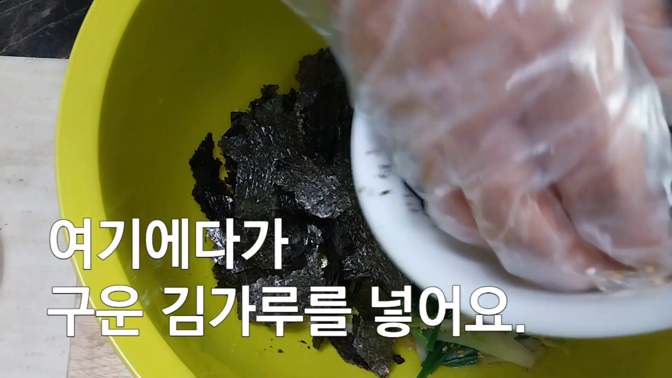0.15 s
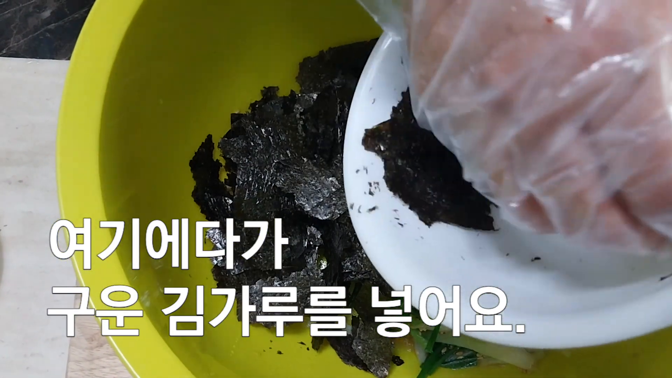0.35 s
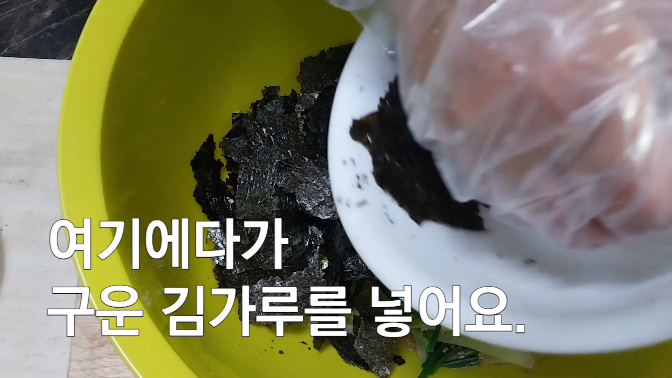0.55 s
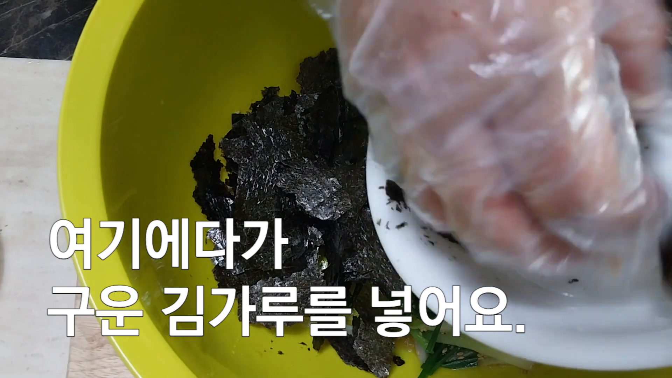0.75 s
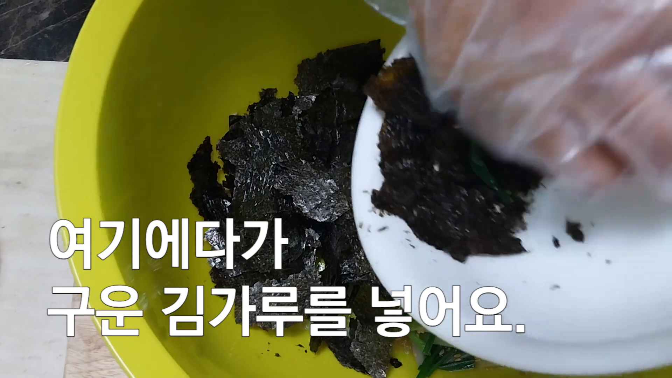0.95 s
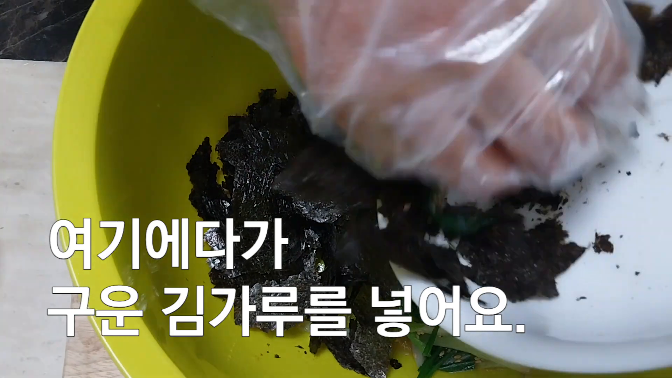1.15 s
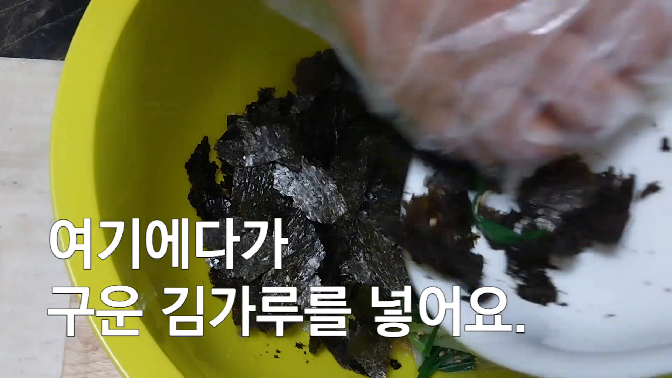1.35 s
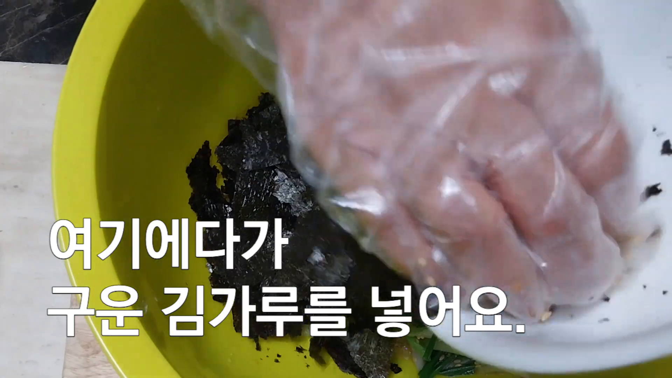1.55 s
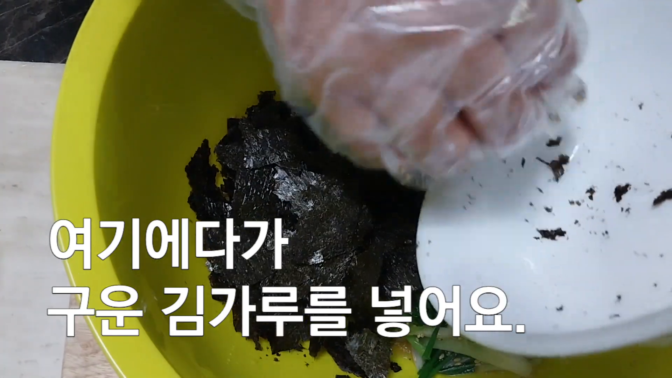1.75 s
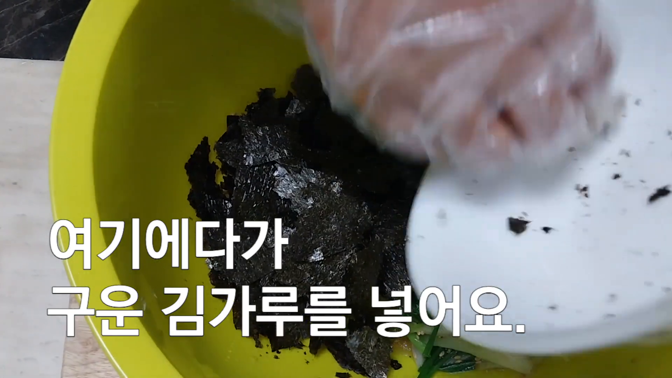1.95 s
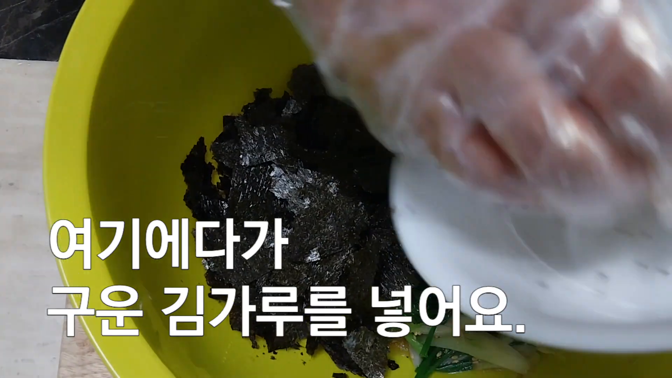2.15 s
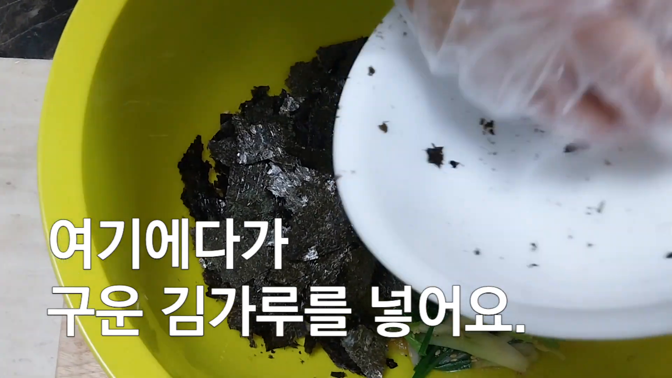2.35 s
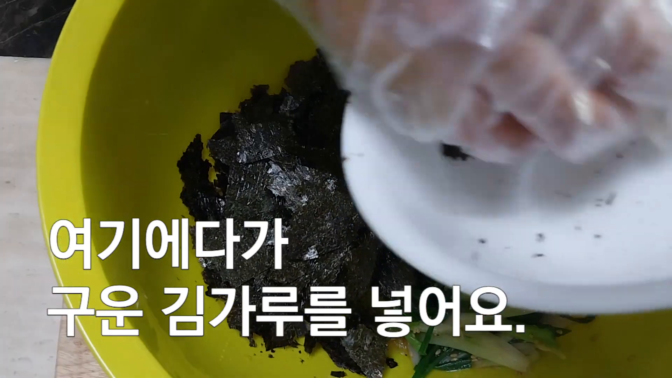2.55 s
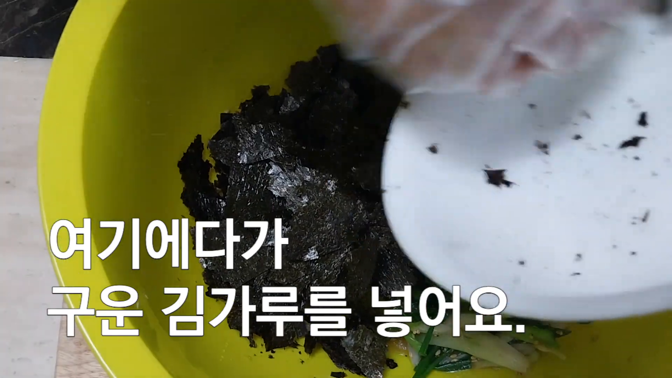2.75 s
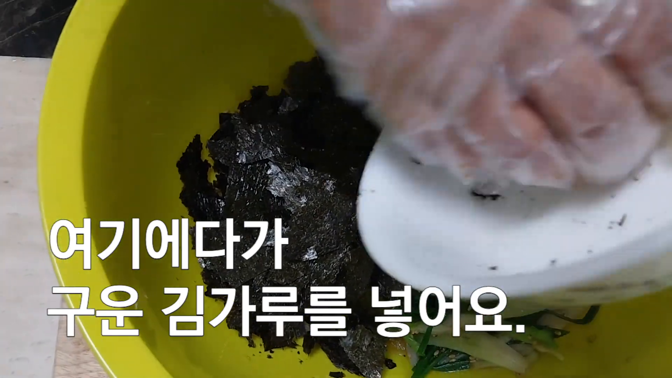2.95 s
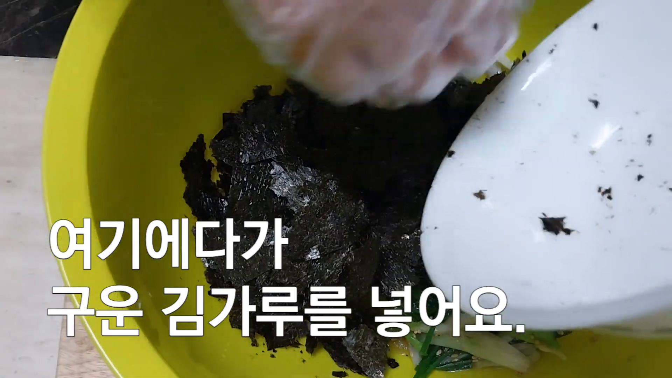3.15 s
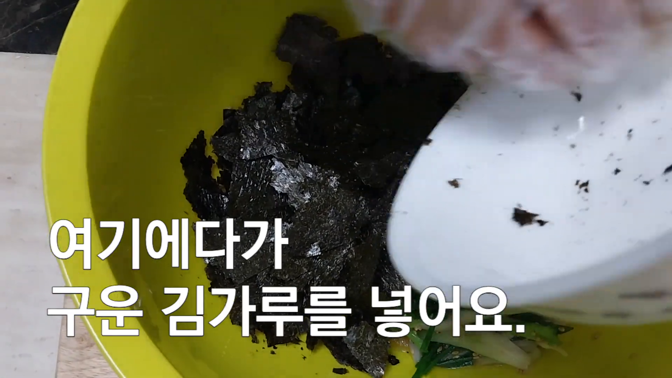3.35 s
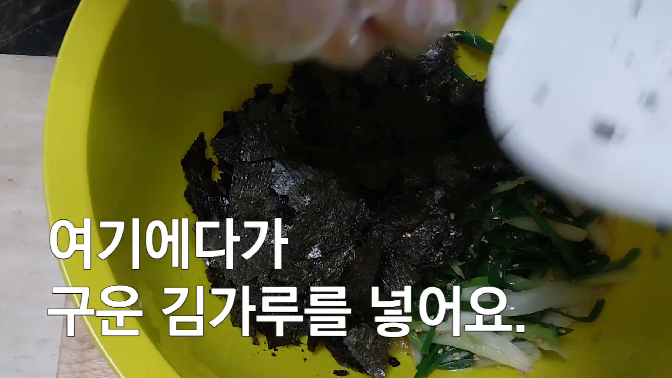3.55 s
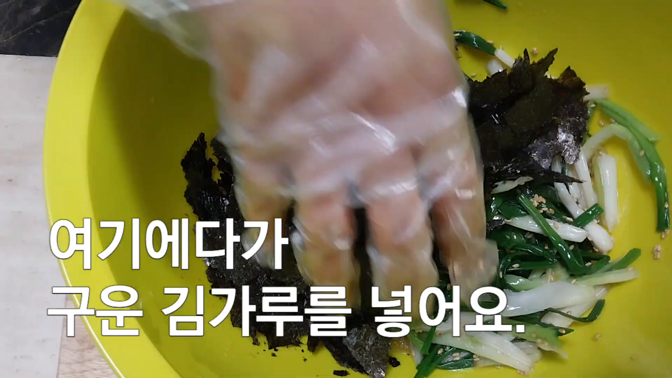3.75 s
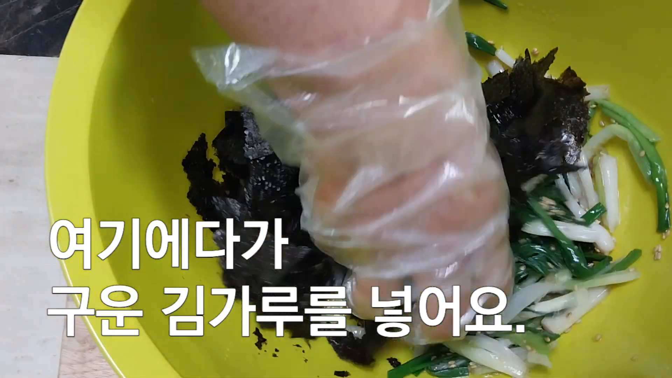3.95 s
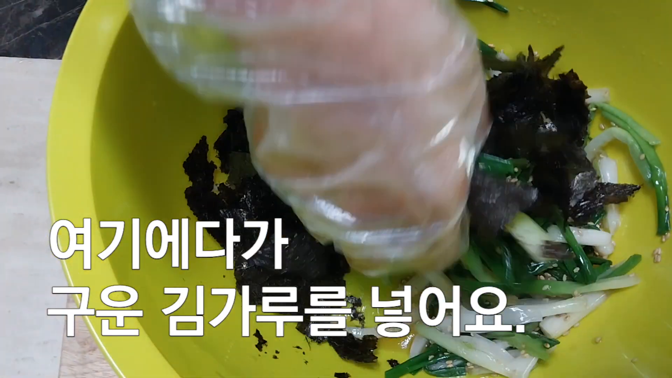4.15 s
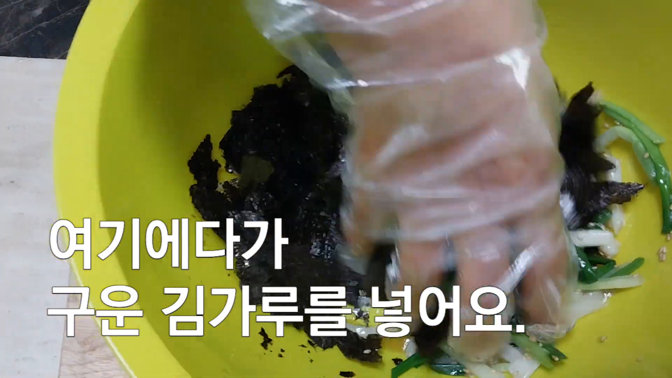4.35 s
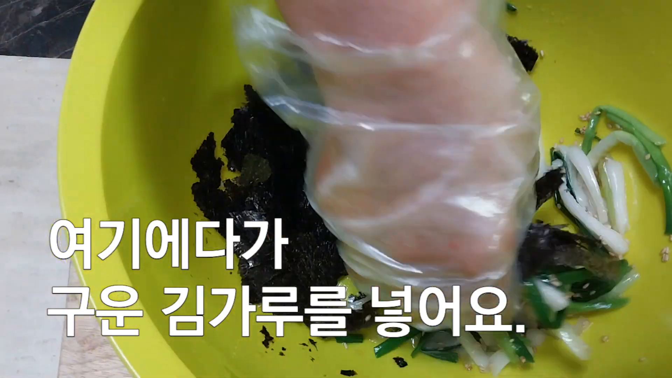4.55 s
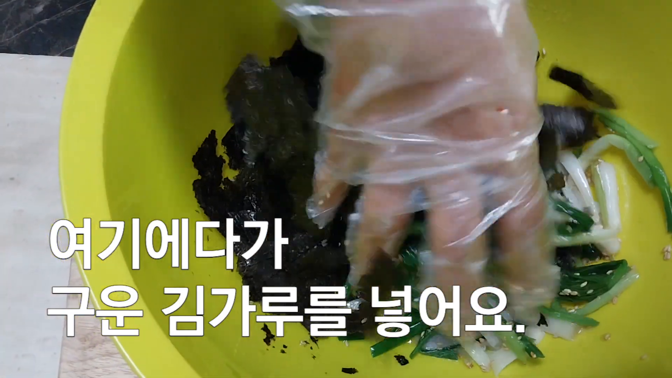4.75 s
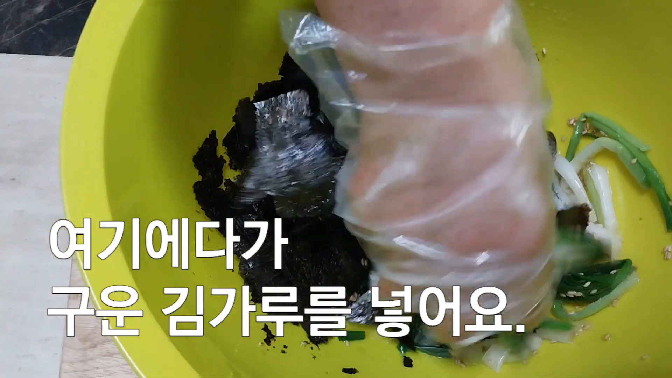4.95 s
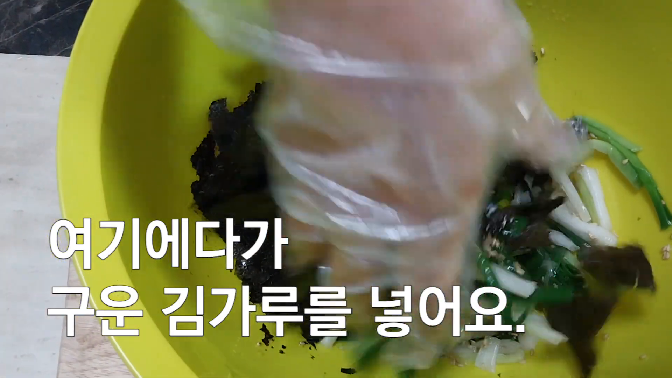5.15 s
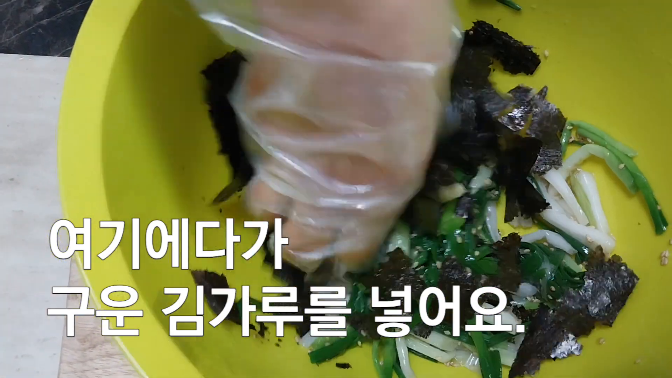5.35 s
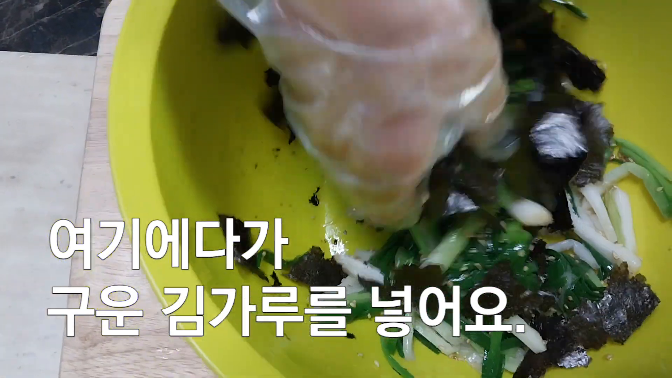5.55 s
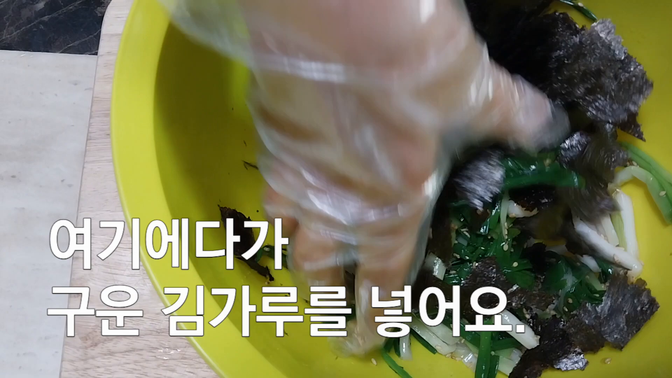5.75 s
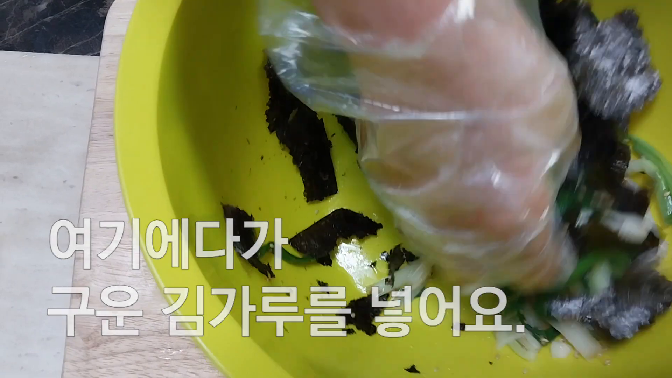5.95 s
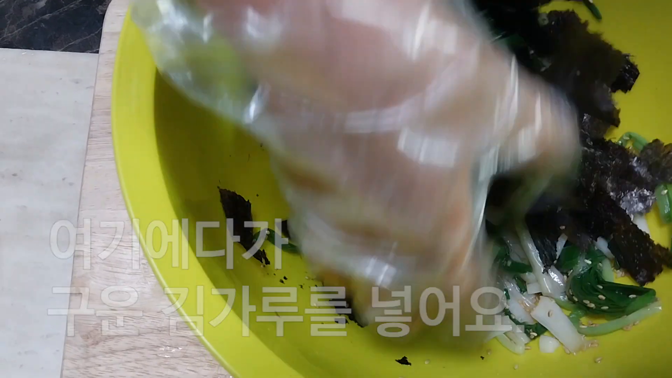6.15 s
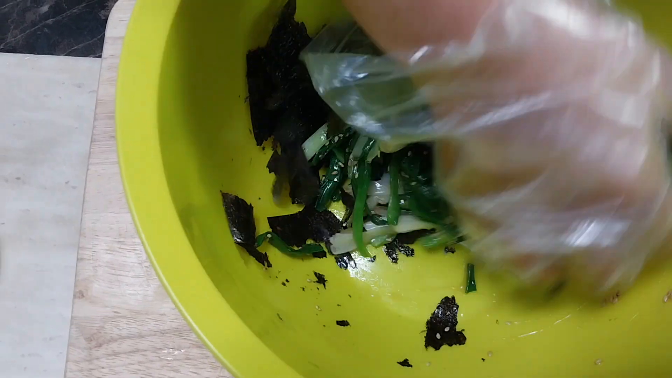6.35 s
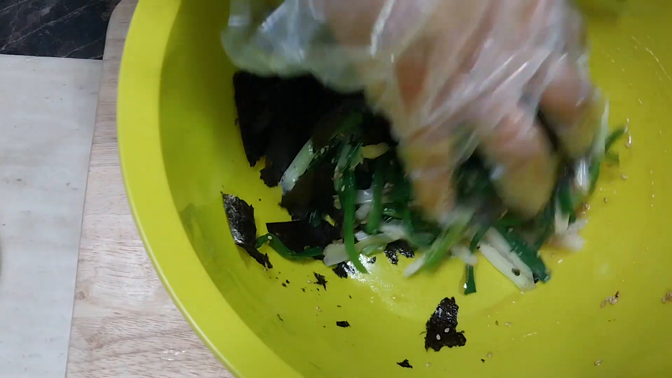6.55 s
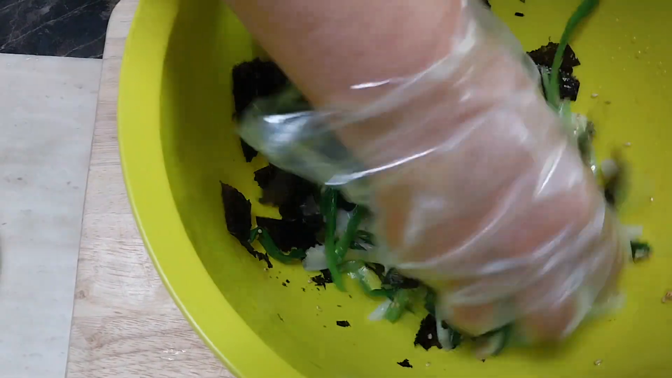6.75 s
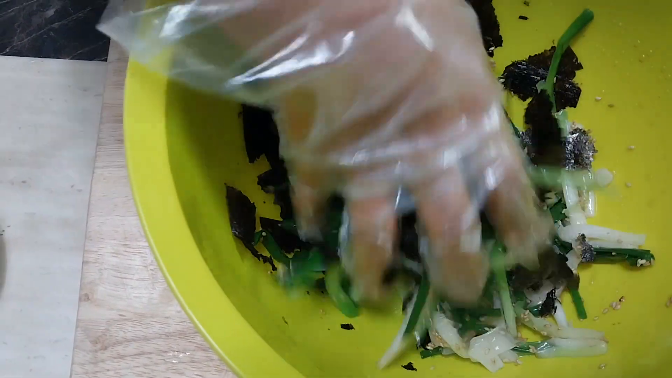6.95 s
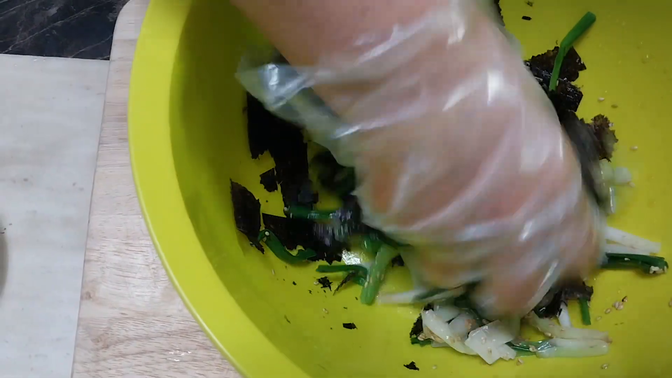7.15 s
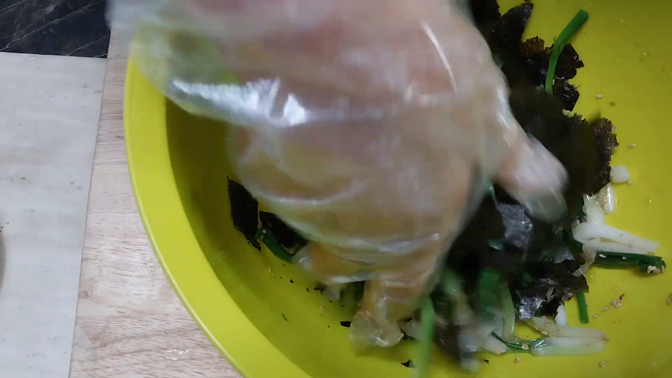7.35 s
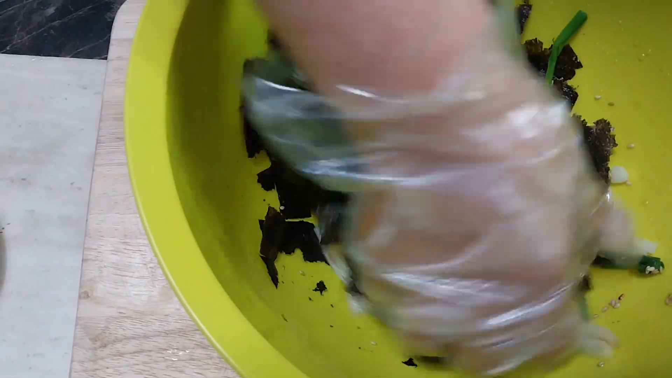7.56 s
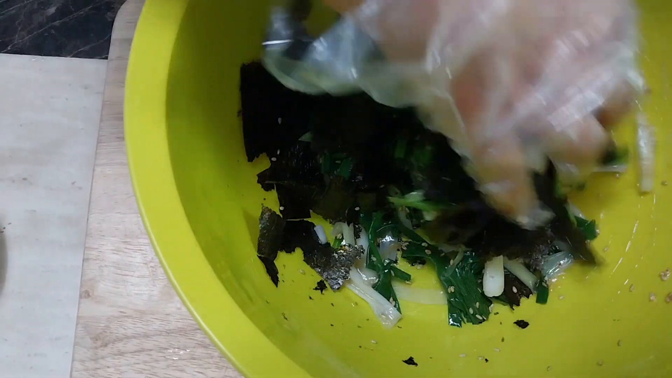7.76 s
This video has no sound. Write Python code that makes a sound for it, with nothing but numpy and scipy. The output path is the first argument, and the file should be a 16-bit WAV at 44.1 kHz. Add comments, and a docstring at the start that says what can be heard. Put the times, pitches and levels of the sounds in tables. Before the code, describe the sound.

A close stereo pickup in a small kitchen with faint air noise and a low, wavering appliance hum. From 0 to 3.5 seconds a hand in a thin plastic glove wipes dry seaweed flakes off a china plate: short, light, irregular strokes of fine crackle, gliding hollow scrapes and sharp little snaps, strongest near 1 second, with very faint china tings. At about 2.8 and 3.55 seconds the plate knocks the plastic bowl, hard and hollow, each followed by a small low thump. From 3.8 seconds the hand tosses the heap in fuller, louder crunchy sweeps, several per second. At 4.5 seconds the plate clatters onto the counter with a woody thud, rattle and brief china ring. Dense rustling continues to nearly 8 seconds, with bright plastic snaps clustering around 5.4, 6.6 and 7.4, over dull wet rubbing and soft plops of greens.

```python
"""A hand in a thin plastic glove wipes dry seaweed off a china plate into a plastic bowl and tosses it with scallions.
Glove and flakes crackle throughout: tiny noise clicks follow the hand's strokes, with louder snaps on top.
Wet greens rub and plop softly, made of dull noise and short low notes.
The plate knocks the bowl twice and clatters onto the counter; dying sine tones make bowl, china and counter ring.
Behind it lie filtered noise for the air, a wavering appliance hum, and the short echoes of a small kitchen."""
import sys
import numpy as np
from scipy import signal
from scipy.fft import rfft, irfft, next_fast_len
from scipy.io import wavfile

SR = 44100
rng = np.random.default_rng(int(sys.argv[2]) if len(sys.argv) > 2 else 0)


def put_to_file(sound):
    """Save the sound as 16-bit audio at rate SR, in the file named by the first command-line argument."""
    columns = np.atleast_2d(sound).T  # one column per channel
    safe = np.clip(columns, -1, 1)
    whole_steps = np.round(safe * 32767)
    wavfile.write(sys.argv[1], SR, whole_steps.astype(np.int16))


N = 343539
T = np.arange(N) / SR
STEPS = T[::64]  # slow clock of the hand's movements [s]
LEFT_RIGHT = np.array([[.5], [-.5]])  # shares a left-minus-right level difference between the sides

# All levels are relative: they set the balance within a source before its later gains.
# wipes of the glove across the plate: (start [s], length [s], crackle level [dB], depth of the crunch [dB])
WIPE_STROKES = [(-.02, 0.056, -42, -9.5), (0.157, 0.21, -48, -6), (0.38, 0.086, -51.5, -3.5),
                (0.45, 0.034, -44.5, -9.5), (0.65, 0.19, -55, -6), (0.836, 0.16, -54.5, -4.5),
                (0.959, 0.11, -40, -5), (1.046, 0.096, -47.5, -4), (1.256, 0.19, -48.5, -5.5),
                (1.56, 0.052, -47, -3.5), (1.633, 0.13, -47.5, -4), (1.804, 0.056, -50.5, -7.5),
                (1.887, 0.025, -47, -3), (1.961, 0.086, -49.5, -5), (2.14, 0.076, -55.5, -26),
                (2.234, 0.032, -50.5, -1), (2.33, 0.22, -60.5, 0), (2.395, 0.024, -45.5, -10),
                (2.463, 0.045, -50, -2.5), (2.587, 0.27, -55.5, -3.5), (2.909, 0.17, -54.5, -1.5),
                (3.109, 0.06, -49.5, -3), (3.25, 0.063, -58, -23), (3.345, 0.043, -53, -4),
                (3.407, 0.063, -51.5, -2), (3.617, 0.17, -53, -8.5)]
WIPE_ATTACK_S, WIPE_RELEASE_S, WIPE_ARCH_DB = 0.02, 0.02, 3  # a wipe is weaker at both ends than halfway
# sweeps of the hand through the heap:
# (crest [s], rise [s], fall [s], crackle level [dB], depth of the crunch [dB])
TOSS_STROKES = [(3.945, 0.098, 0.096, -39, -5.5), (4.055, 0.08, 0.061, -41.5, -5),
                (4.22, 0.069, 0.12, -41, -7.5), (4.45, 0.15, 0.21, -43, -3),
                (4.72, 0.062, 0.035, -42.5, -6.5), (4.934, 0.13, 0.11, -39.5, -4),
                (5.19, 0.11, 0.11, -44, -7.5), (5.3, 0.018, 0.035, -47, -11),
                (5.37, 0.091, 0.14, -40.5, -3), (5.457, 0.086, 0.056, -31.5, -5),
                (5.58, 0.11, 0.087, -40, -7), (5.77, 0.14, 0.14, -43, -7), (5.93, 0.087, 0.068, -43, -2.5),
                (6.17, 0.16, 0.14, -41, -7), (6.41, 0.11, 0.1, -48.5, -4.5), (6.62, 0.12, 0.12, -38, -3),
                (6.76, 0.098, 0.06, -40.5, -7), (6.98, 0.11, 0.12, -41.5, -5.5),
                (7.095, 0.068, 0.093, -34.5, -8), (7.345, 0.098, 0.072, -40.5, -5.5),
                (7.44, .03, 0.037, -46, -7), (7.6, 0.12, 0.11, -43, -7), (7.78, 0.077, .08, -45.5, -7.5)]
EASE_DB, EASE_SHAPE = 9, 1.96  # a sweep is this far down one rise before and one fall after its crest
REST_DB, REST_DEPTH_DB = -61.5, -12  # crackle level and crunch depth between strokes

# dense chance crackle of the flakes: (rate [per s], spread of sizes [dB], level against the stroke [dB])
FLAKE_GRAINS = (6000, 2.5, 3.3)
# sparser chance ticks of the glove: (rate [per s], spread of sizes [dB], level against the stroke [dB])
GLOVE_GRAINS = (170, 3.1, -18)
# tone colour of the crackle: (frequency [Hz], level [dB])
CRACKLE_SPECTRUM = [(40, -22), (250, -20.5), (440, -11.5), (700, -3), (1100, -2), (1400, -4), (2000, -1.5),
                    (3400, -2.5), (5200, 0.2), (6800, -4), (7900, -6), (8700, -13), (9700, -5.5),
                    (12000, 0.5), (15600, -3)]
# resonances of the plate that colour the crackle: (frequency [Hz], width [Hz], level [dB])
PLATE_RESONANCES = [(606, 92, 1), (1100, 74, 10), (1680, 160, -6), (2350, 370, -0.5), (2820, 190, -0.5),
                    (5240, 500, -3)]
# resonances of the bowl that colour the crackle: (frequency [Hz], width [Hz], level [dB])
BOWL_RESONANCES = [(638, 104, 0.5), (1020, 240, -0.5), (1640, 380, 0), (2320, 240, -14),
                   (4900, 2300, -14.5)]
# the hollow of the cupped hand sliding over the plate, and in the last row the plate creaking against the bowl:
# # (start [s], length [s], first pitch [Hz], last pitch [Hz], level [dB])
HOLLOW_SCRAPES = [(.2, 0.19, 1400, 900, -3), (.5, 0.28, 1600, 1750, 7), (.98, 0.15, 1700, 1100, 2),
                  (1.38, 0.082, 1150, 680, 8), (1.64, 0.087, 1100, 720, 0), (1.97, 0.098, 1000, 580, -1),
                  (2.31, .14, 1350, 2100, 9), (2.61, .13, 2000, 1450, 3), (2.783, 0.063, 700, 640, 13)]
SCRAPE_WIDTH_HZ = 450
PLATE_PAN_DB, BOWL_PAN_DB = .4, -2  # left minus right; the hand works to the right once it is in the bowl
TREBLE_PAN_DB, TREBLE_PAN_HZ = -2, 7000  # in the bowl the glove's treble leans further to the right

# single creases and flakes that snap: (time [s], peak level [dB], centre [Hz], length of the crack [ms])
LOUD_SNAPS = [(.0672, -30, 12200, 1), (0.4549, -28, 2060, 1.5), (.4733, -28, 2620, 2),
              (0.821, -33, 12000, 1), (.8405, -33, 12000, 1), (.9328, -32, 5120, 2),
              (0.9517, -19, 12100, .6), (0.9727, -27, 3200, 1.5), (1.0889, -19, 2400, 1.1),
              (1.115, -28, 6000, 1), (1.128, -29, 5500, .6), (1.149, -33, 2400, 1), (1.2181, -33, 4930, 1),
              (1.2665, -33, 2760, 2), (1.4145, -30, 5500, 2), (1.541, -35, 4500, 2),
              (1.4606, -27.5, 4200, 4), (1.4705, -27, 11000, .6), (1.5808, -25, 5180, 1.5),
              (1.9116, -31, 13000, .7), (2.1355, -40, 5150, 1.5), (2.162, -39, 5220, 1),
              (2.2483, -33, 5140, 1), (2.4124, -34, 1920, 2), (2.4892, -25.5, 5110, 1.2),
              (2.494, -26, 5110, 1.2), (2.5945, -32.5, 5830, 2), (2.8145, -31, 5090, 3),
              (2.9931, -28, 5130, 3), (3.0659, -31, 4500, 3), (3.3643, -33, 5120, 3),
              (3.9255, -26, 4080, .4), (4.1515, -27, 10000, .7), (4.357, -21, 13800, .7),
              (4.7795, -26, 11500, 1), (5.2839, -25, 4390, 2.5), (5.4142, -15.5, 3600, .5),
              (5.4695, -16, 4000, .5), (5.4959, -15, 4500, .7), (5.7723, -23, 11600, .5),
              (6.2053, -25, 14400, .5), (6.2542, -24, 3890, 1.6), (6.5126, -23.5, 2600, 2.5),
              (6.5954, -15, 3500, 1.1), (6.6205, -16, 2600, .7), (6.6302, -17, 4000, .7),
              (6.6664, -22, 4690, .3), (6.681, -23, 3000, 3), (6.7093, -21, 13700, .8),
              (6.7385, -24, 13000, .5), (6.7465, -24, 13000, .4), (6.78, -25, 13000, .8),
              (6.787, -26, 1500, .6), (6.9945, -25, 14200, .5), (6.9996, -20, 14100, .5),
              (7.0194, -20, 12400, .5), (7.2775, -28, 5730, 1), (7.3547, -24, 5440, .5),
              (7.4086, -14, 10500, .8), (7.4195, -24, 5910, 1), (7.6525, -25, 14100, .5)]
SPURT_DB, SPURT_S = -17, 0.0091  # noise that trails each crack: level and decay time
# small chance snaps of the glove: their peak in a stroke of USUAL_DB
CRINKLES_PER_S, CRINKLE_DB, CRINKLE_SPREAD_DB, CRINKLE_LOW_HZ = 34, -36.5, 3, 2550
USUAL_DB, CRINKLE_FOLLOW = -44.5, 0.33  # they follow the stroke only in part, so they stand out in the lulls

# the palm bears down on the wet greens: (crest [s], rise [s], fall [s], level [dB])
PALM_PRESSES = [(1.59, 0.013, 0.022, -55), (1.72, .05, 0.063, -55.5), (2.255, 0.01, 0.017, -53),
                (2.93, 0.13, 0.12, -55), (3.67, 0.064, 0.052, -53), (4.38, 0.027, 0.056, -52.5),
                (4.69, 0.067, .05, -58), (4.86, 0.027, 0.09, -49.5), (5.32, 0.042, 0.081, -52),
                (5.485, 0.12, 0.1, -47), (5.83, 0.13, 0.079, -51.5), (6.249, 0.047, 0.065, -50),
                (6.62, 0.063, 0.052, -49), (7.1, 0.12, 0.059, -53), (7.67, 0.027, 0.052, -60)]
# wet clumps that land in the bowl: (time [s], level [dB], pitch [Hz])
CLUMP_LANDINGS = [(4.839, -24.5, 437), (5.314, -32.5, 328), (5.483, -36, 260), (5.777, -30.5, 343),
                  (5.832, -28.5, 360), (5.899, -38, 330), (6.223, -31, 370), (6.276, -30, 370),
                  (6.568, -29, 390), (6.613, -26.5, 370), (7.029, -33, 400), (7.1, -39, 350)]
# the bowl's answer to a wet clump: (multiple of its pitch [ratio], level [dB], time to fade by 60 dB [s])
PLOP_MODES = [(.74, -1, 0.029), (1, 4, 0.023), (1.3, 4, .025), (1.7, -7, 0.029)]
# tone colour of the rubbing greens: (frequency [Hz], level [dB])
GREENS_SPECTRUM = [(30, -31), (90, -13), (160, 1), (330, -0.5), (480, 3.5), (750, -1), (1500, -25.5),
                   (5000, -64)]
DRAG_DB = -23  # any stroke drags the greens along, this far against its crackle level

# blows on the plastic bowl, sharp from the plate, soft from the hand:
# (time [s], level [dB], contact time [ms])
BOWL_KNOCKS = [(2.8308, -11, 0.47), (2.8355, -26, 0.92), (3.5453, -14, 0.44), (3.5482, -19.5, 0.55),
               (3.5556, -25, 1.2), (4.36, -36, 4.7), (4.396, -35, 3.8)]
# ringing tones of the bowl: (frequency [Hz], level [dB], time to fade by 60 dB [s])
BOWL_MODES = [(181, -9, 0.077), (385, -10, 0.051), (447, -18, 0.04), (623, 1, 0.04), (826, 4, 0.035),
              (1025, 8.5, 0.031), (1107, -1.5, 0.085), (1720, 4.5, 0.011), (1980, 3, 0.011),
              (2740, 4.5, 0.027), (4540, 1, .01)]
# the bowl's base drops back on the counter, edge after edge: (time [s], peak level [dB], pitch [Hz])
BASE_THUMPS = [(2.876, -21, 300), (2.8805, -24, 312), (3.5817, -25, 300), (3.586, -31, 330),
               (3.6665, -38.5, 400)]
THUMP_CYCLES = 0.53  # half-length of a thump in cycles of its pitch
# the counter top gives under the bowl: (frequency [Hz], width [Hz], level [dB])
COUNTER_GIVE = [(78, 27, 6.5)]

# contacts of the plate: (time [s], china level [dB], counter thud level [dB],
# share of the free ring time that the grip leaves [ratio])
PLATE_CONTACTS = [(2.248, -33, -53, 0.54), (2.994, -42, -59, .7), (3.0215, -24.5, -63.5, 0.44),
                  (3.066, -44, -52, .4), (4.519, -15, -16, 0.92), (4.521, -11.5, -12, 0.94),
                  (4.528, -31, -26, 1), (4.5465, -28, -19, 1), (4.568, -29.5, -21.5, 1),
                  (4.583, -37, -28.5, 1)]
# ringing tones of the china: (frequency [Hz], level [dB], time to fade by 60 dB [s])
CHINA_MODES = [(2370, -24, 0.082), (2805, -16.5, 0.11), (5174, -10.5, 0.15), (5210, -7.5, 0.15),
               (5160, -1.5, 0.033), (8468, -16, 0.1), (11160, -11, 0.048), (13560, -12, 0.048)]
# ringing tones of the counter: (frequency [Hz], level [dB], time to fade by 60 dB [s])
COUNTER_MODES = [(151.6, -13.5, 0.16), (195, -8, 0.17), (437, -10.5, 0.2), (652, -3, 0.19), (742, -2, 0.19),
                 (1070, -6, 0.15), (1130, -4, .19), (1230, 7, 0.049), (1290, 4, 0.11), (1384, 5, .04),
                 (940, -7, .05), (1517, -9, 0.13), (1696, -7, 0.11), (1850, -1.5, 0.17), (2020, -3, 0.11),
                 (2350, -3, .09)]
# tone colour of the noisy part of the thud: (frequency [Hz], level [dB])
THUD_SPECTRUM = [(40, -44), (110, -11), (190, 3), (400, -7), (700, 1), (1300, 7.5), (1700, 3.5), (2600, -4),
                 (3300, -14.5), (6000, -23), (9000, -21), (15000, -21)]
# fingertips nudge the plate: (time [s], level [dB])
PLATE_NUDGES = [(.012, -43), (1.267, -41), (2.625, -49), (2.992, -42), (3.024, -50)]
NUDGE_DULL_DB_PER_OCTAVE, NUDGE_RISE_S = 21, 0.0028

# tone colour of the room air: (frequency [Hz], level [dB])
AIR_SPECTRUM = [(20, -8), (70, 4), (140, 1.5), (200, 10), (280, 1.5), (400, -3), (600, -10), (1100, -24),
                (2500, -2), (8000, -17), (16000, -47)]
AIR_DB, HUM_HZ, HUM_DB = -66.5, 204.6, -68
HUM_WIDTH_HZ, HUM_STEADY_DB = 4.9, 3.5  # a steady tone inside a narrow band of turbulence
# fading of the kitchen's echo tail: (frequency [Hz], time to fade by 60 dB [s])
KITCHEN_FADE = [(100, 0.45), (500, 0.44), (2000, 0.37), (6000, 0.14), (15000, 0.075)]
EDGE_HZ = 16100


def wipe(start, length):
    """The glove catches, slides, pressing hardest halfway, and lifts off."""
    t = STEPS - start
    across = 2 * np.clip(t / length, 0, 1) - 1
    arch = amp(WIPE_ARCH_DB * (0.06 - across ** 2))
    attack = np.clip(t / WIPE_ATTACK_S, 0, 1)
    release = np.exp(-np.clip((t - length) / WIPE_RELEASE_S, 0, 20))
    return arch * attack * release


def sweep(crest, rise, fall):
    """The hand speeds up to a crest and slows again."""
    away = np.maximum((crest - STEPS) / rise, (STEPS - crest) / fall)
    return amp(-EASE_DB * np.minimum(away, 10) ** EASE_SHAPE)


def effort():
    """All strokes add their power: level of the crackle and depth of the crunch, both in dB."""
    strokes = [(wipe(s, length), db, depth) for s, length, db, depth in WIPE_STROKES]
    strokes += [(sweep(s, rise, fall), db, depth) for s, rise, fall, db, depth in TOSS_STROKES]
    power = amp(REST_DB) ** 2
    deep = amp(REST_DB + REST_DEPTH_DB) ** 2
    for shape, db, depth in strokes:
        power = power + (shape * amp(db)) ** 2
        deep = deep + (shape * amp(db + depth)) ** 2
    stroke_db = np.interp(T, STEPS, 10 * np.log10(power))
    depth_db = np.interp(T, STEPS, 10 * np.log10(deep / power))
    return stroke_db, depth_db


def grains(per_s, spread_db, restless_db=8.0, size=36, count=6):
    """Tiny fractures of uneven size at several spots; each spot has its own colour and is busy in its own fits."""
    out = np.zeros((2, N))
    knots = np.arange(0, 8, .022)
    fade = np.exp(-4 * np.arange(size) / size)
    for _ in range(count):
        when, chance, strength = rng.random((3, 16000))
        at = (when * N).astype(int)
        happens = chance < per_s * N / SR / count / len(at)
        busy_db = restless_db * np.interp(at / SR, knots, rng.uniform(-0.74, 1, len(knots)))
        size_db = spread_db * np.minimum(-np.log(strength), 4)
        sign = (-1) ** at
        clicks = np.bincount(at, happens * amp(busy_db + size_db) * sign, N)
        for side in out:
            grain = unit(rng.standard_normal(size) * fade)
            side += np.convolve(clicks, grain)[:N]
    return unit(out)


def rustle(stroke_db, depth_db):
    """Dense fine crackle of the flakes and sparser ticks of the glove, in clumps as the fingers catch and slip."""
    level_db = stroke_db + 1.1 * wander(.007)
    flake_rate, flake_spread_db, flake_db = FLAKE_GRAINS
    fine = grains(flake_rate, flake_spread_db, restless_db=2.5) * amp(level_db + flake_db)
    # the glove keeps ticking when the hand slows down
    tick_rate, tick_spread_db, tick_db = GLOVE_GRAINS
    ticks = grains(tick_rate, tick_spread_db, restless_db=4) * amp(.7 * level_db + tick_db)
    crackle = colour(two_ports(fine + ticks, shared_hz=1530), CRACKLE_SPECTRUM)
    # pressing into the heap breaks larger flakes, which sound lower
    deep = signal.sosfiltfilt(signal.butter(2, 3200, fs=SR, output="sos"), crackle)
    crackle = crackle + deep * (amp(depth_db + 5.0) - 1)
    # the hollow under the hand keeps changing shape, lifting and sinking bands
    for hz in (850, 1700, 2720, 4220):
        band = resonate(crackle, [(hz, hz / 3, 0)])
        crackle = crackle + band * (amp(1.9 * wander(.03) - .4) - 1)
    return crackle


def scrape(x):
    """The cupped hand rings with a broad resonance that glides as its hollow changes size; the plate's creak
    against the bowl rings the same way."""
    out = np.zeros_like(x)
    r = np.exp(-np.pi * SCRAPE_WIDTH_HZ / SR)
    for s, length, from_hz, to_hz, db in HOLLOW_SCRAPES:
        part = x[:, round(s * SR):][:, :round(length * SR)]
        n = part.shape[1]
        turn = np.exp(2j * np.pi * np.cumsum(np.geomspace(from_hz, to_hz, n)) / SR)
        # shift the gliding pitch down to zero, smooth there, and shift back
        smooth = signal.lfilter([1 - r], [1, -r], part / turn)
        ringing = 2 * (turn * smooth).real
        add(out, s, amp(db) * ringing * signal.windows.tukey(n, .3))
    return out


def snap(hz, length_ms):
    """A crease flips with a crack around its own pitch and sets off a short spurt of fading noise."""
    t = np.arange(SR // 25) / SR
    flip = np.exp(-(np.maximum(t - .0011, 0) * 1000 / length_ms) ** 2)
    onset = np.minimum(t / .0011, 1) ** 4
    spurt = amp(SPURT_DB) * np.exp(-t / SPURT_S)
    crack = rng.standard_normal((2, len(t))) * onset * (flip + spurt)
    crack = resonate(colour(crack, CRACKLE_SPECTRUM, size=256), [(hz, hz * 0.8, 0)])
    return crack / abs(crack).max()


def snaps(stroke_db):
    """The loud snaps of creases and flakes, and small chance ones that grow with the stroke."""
    out = np.zeros((2, N))
    for s, db, hz, length_ms in LOUD_SNAPS:
        add(out, s, amp(db + 2.5) * snap(hz, length_ms))
    creases = [snap(hz, .9) for hz in np.geomspace(CRINKLE_LOW_HZ, 14000, 30)]
    for when, chance, strength, pick, side in rng.random((400, 5)):
        if chance < CRINKLES_PER_S * N / SR / 400:
            follow_db = CRINKLE_FOLLOW * (stroke_db[int(when * N)] - USUAL_DB)
            size_db = CRINKLE_SPREAD_DB * min(-np.log(strength), 2)
            pan_db = (side - .5) * np.array([[8], [-8]])
            crease = creases[int(pick * len(creases))]
            add(out, when * N / SR, amp(CRINKLE_DB + follow_db + size_db + pan_db) * crease)
    return out


def glove(stroke_db, depth_db):
    """The hand first wipes the hard plate, which sounds thin, then moves into the hollow bowl."""
    crackle = rustle(stroke_db, depth_db)
    in_bowl = follow([(3.5, 0.55), (3.8, 1)])
    thin = signal.lfilter(*signal.butter(1, 500, "high", fs=SR), crackle)
    on_plate = thin + amp(-0.5) * resonate(thin, PLATE_RESONANCES) + scrape(thin)
    in_heap = amp(-0.9) * crackle + amp(-4.5) * resonate(crackle, BOWL_RESONANCES)
    hand = (1 - in_bowl) * on_plate + in_bowl * in_heap + snaps(stroke_db)
    treble = signal.sosfiltfilt(signal.butter(1, TREBLE_PAN_HZ, "high", fs=SR, output="sos"), hand)
    hand = hand + in_bowl * treble * (amp(TREBLE_PAN_DB * LEFT_RIGHT) - 1)
    return hand * amp(follow([(3.5, PLATE_PAN_DB), (3.8, BOWL_PAN_DB)]) * LEFT_RIGHT)


def greens(stroke_db):
    """Wet stalks shift and rub the bowl under the palm; clumps land with a soft, short plop."""
    rubbing = colour(two_ports(rng.standard_normal((2, N)), shared_hz=1030), GREENS_SPECTRUM)
    presses = sum(amp(db) * sweep(s, rise, fall) for s, rise, fall, db in PALM_PRESSES)
    push = amp(stroke_db + DRAG_DB) + np.interp(T, STEPS, presses)
    out = push * amp(-3.0 + 2 * wander(.015)) * unit(rubbing)
    t = np.arange(SR // 10) / SR
    soft_start = (1 - np.exp(-t / 0.0022)) ** 2
    for s, db, hz in CLUMP_LANDINGS:
        modes = [(k * hz * rng.uniform(0.95, 1.113), level, t60) for k, level, t60 in PLOP_MODES]
        plop = ring(modes, t, apart_hz=2000)
        add(out, s, amp(db) * plop * soft_start)
    return signal.lfilter(*signal.butter(2, 70, "high", fs=SR), out)


def bowl():
    """A force pulse drives the bowl's ringing tones: the longer the contact, the duller the knock."""
    t = np.arange(SR // 3) / SR
    out = np.zeros((2, N))
    for s, db, contact_ms in BOWL_KNOCKS:
        force = np.sin(np.pi * np.minimum(1000 * t / contact_ms, 1)) ** 2
        ringing = ring(BOWL_MODES, t, apart_hz=1500)
        knock = signal.fftconvolve(ringing, force[None], axes=1)[:, :len(t)]
        # the bright tick weakens quickly as the contact gets longer
        tick = rng.standard_normal((2, len(t))) * np.exp(-t / 0.0034) * amp(-11 - 20 * contact_ms)
        add(out, s, amp(db) * (knock / abs(knock).max() + tick))
    return out


def thumps():
    """The bowl's base lands flat: one solid push with hardly any ring, and the counter top booms."""
    t = np.arange(-SR // 100, SR // 100) / SR
    out = np.zeros((2, N))
    for s, db, hz in BASE_THUMPS:
        push = np.cos(2 * np.pi * hz * t) * np.exp(-(hz * t / THUMP_CYCLES) ** 2)
        add(out, s + t[0], -amp(db) * push[None])
    return out + resonate(out, COUNTER_GIVE)


def plate():
    """The china rings at each contact; set down, it rattles on its foot and shakes the counter."""
    t = np.arange(SR // 2) / SR
    out = np.zeros((2, N))
    for s, ring_db, thud_db, free in PLATE_CONTACTS:
        gripped = [(hz, db, t60 * free) for hz, db, t60 in CHINA_MODES]
        china = ring(gripped, t, apart_hz=3000) * amp([[-3], [2]]) * (1 - np.exp(-t / 0.00042))
        noise = two_ports(rng.standard_normal((2, len(t))), shared_hz=793)
        dense = colour(noise, THUD_SPECTRUM) * amp(-60 * t / 0.1)
        boom = ring(COUNTER_MODES, t, apart_hz=1200) * (1 - np.exp(-t / 0.0031))
        counter = amp(-17.0) * boom + amp(-7.0) * dense
        add(out, s, amp(ring_db - 5.5) * china + amp(thud_db) * counter * amp([[-.6], [.6]]))
    return out


def nudges():
    """A soft fingertip sets the china singing faintly, mostly in its low notes."""
    t = np.arange(SR // 4) / SR
    out = np.zeros((2, N))
    centre_hz = CHINA_MODES[1][0]
    modes = []
    for hz, db, t60 in CHINA_MODES:
        dull_db = NUDGE_DULL_DB_PER_OCTAVE * abs(np.log2(hz / centre_hz))
        modes.append((hz, db - dull_db, t60))
    for s, db in PLATE_NUDGES:
        note = ring(modes, t, apart_hz=3000) * (1 - np.exp(-t / NUDGE_RISE_S))
        add(out, s, amp(db) * note / abs(note).max())
    return out


def background():
    """Room air as coloured noise, and the wavering hum of an appliance fan as narrow noise around a tone."""
    air = unit(colour(two_ports(rng.standard_normal((2, N)), shared_hz=475), AIR_SPECTRUM))
    hz = np.fft.rfftfreq(N, 1 / SR)
    narrow = 1 + ((hz - HUM_HZ) / HUM_WIDTH_HZ) ** 2
    waver = unit(irfft(rfft(rng.standard_normal(N)) / narrow, N))
    tone = unit(np.sin(2 * np.pi * HUM_HZ * T + 0.53 * wander(.09)))
    hum = unit(waver + amp(HUM_STEADY_DB) * tone)
    return amp(AIR_DB) * air + amp(HUM_DB) * hum


def kitchen(x, early_db, tail_db, count=14):
    """Adds early echoes from bowl, counter and wall, then a short diffuse tail."""
    hz, t, z = signal.stft(rng.standard_normal((2, SR // 2)), SR, nperseg=256)
    fade = amp(-60 * t / read(KITCHEN_FADE, hz)[:, None]) * np.minimum(t / 0.0028, 1)
    tail = signal.istft(z * fade, SR, nperseg=256)[1]
    echoes = np.zeros_like(tail)
    for side in echoes:
        delay = rng.uniform(0.0021, 0.02, count)
        side[(delay * SR).astype(int)] = rng.choice([-1, 1], count) * np.exp(-delay / 0.0042)
    early = amp(early_db) * echoes / np.linalg.norm(echoes[0])
    late = amp(tail_db) * tail / np.linalg.norm(tail[0])
    response = two_ports(early + late, shared_hz=680)
    return x + signal.oaconvolve(x, response, axes=1)[:, :N]


def ring(modes, t, apart_hz):
    """Dying tones; the higher ones reach the two sides out of step."""
    out = np.zeros((2, len(t)))
    for hz, db, t60 in modes:
        lag = np.array([[-1], [1]]) * rng.choice([-1, 1]) * min(hz / apart_hz, 1) * np.pi / 4
        out += amp(db - 60 * t / t60) * np.cos(2 * np.pi * hz * t + lag)
    return out


def resonate(x, modes):
    """The sound passed through a few resonances."""
    return sum(amp(db) * signal.lfilter(*signal.iirpeak(hz, hz / width, fs=SR), x) for hz, width, db in modes)


def colour(x, points, size=2048):
    """Filter of unit energy with the given spectrum, which answers only after its input."""
    log_gain = np.log(amp(read(points, abs(np.fft.fftfreq(size, 1 / SR)))))
    taps = np.fft.ifft(np.exp(np.conj(signal.hilbert(log_gain)))).real
    return signal.oaconvolve(x, taps[None] / np.linalg.norm(taps), axes=1)[:, :x.shape[1]]


def two_ports(x, shared_hz):
    """Long waves reach both sides alike, short waves differ."""
    n = next_fast_len(x.shape[1], real=True)
    same = 1 / (1 + (np.fft.rfftfreq(n, 1 / SR) / shared_hz) ** 2)
    a, b = rfft(x, n)
    return irfft([a, same * a + np.sqrt(1 - same ** 2) * b], n)[:, :x.shape[1]]


def wander(seconds):
    """A random drift of rms 1, in straight lines between chance points this far apart."""
    knots = np.arange(0, 8, max(seconds, .004))
    return unit(np.interp(T, knots, rng.standard_normal(len(knots))))


def amp(db):
    """Decibels to gain."""
    return np.exp(np.asarray(db) * (np.log(10) / 20))


def unit(x):
    """Scales to rms 1."""
    return x / np.sqrt(np.mean(x ** 2) + 1e-20)


def follow(rows):
    """A control curve at every sample."""
    return np.interp(T, *np.transpose(rows))


def read(points, hz):
    """A spectrum at the given frequencies."""
    f, value = np.transpose(points)
    return np.interp(np.log(hz + 1), np.log(f), value)


def add(mix, s, sound):
    """Lays a sound into the stereo mix at time s."""
    part = mix[:, round(s * SR):][:, :sound.shape[1]]
    part += sound[:, :part.shape[1]]


def scene():
    """Hand, greens, bowl and plate in the kitchen."""
    stroke_db, depth_db = effort()
    hand = glove(stroke_db, depth_db)
    # the knocks carry no deep bass below 120 Hz
    bowl_knocks = signal.lfilter(*signal.butter(2, 120, "high", fs=SR), bowl())
    knocks = kitchen(bowl_knocks, early_db=-10.0, tail_db=-14.0)
    knocks += kitchen(thumps(), early_db=-14, tail_db=-18)
    clatter = kitchen(plate() + nudges(), early_db=-11.5, tail_db=-8)
    hand_and_greens = kitchen(hand + greens(stroke_db), early_db=-10.0, tail_db=-14.5)
    return hand_and_greens + knocks + clatter + background()


def record(dry):
    """A steep low-pass filter removes the sound above EDGE_HZ."""
    taps = signal.firwin(401, EDGE_HZ, window=("kaiser", 9), fs=SR)
    return signal.oaconvolve(dry, taps[None], "same")


dry = scene()
out = record(dry)
put_to_file(out)
```